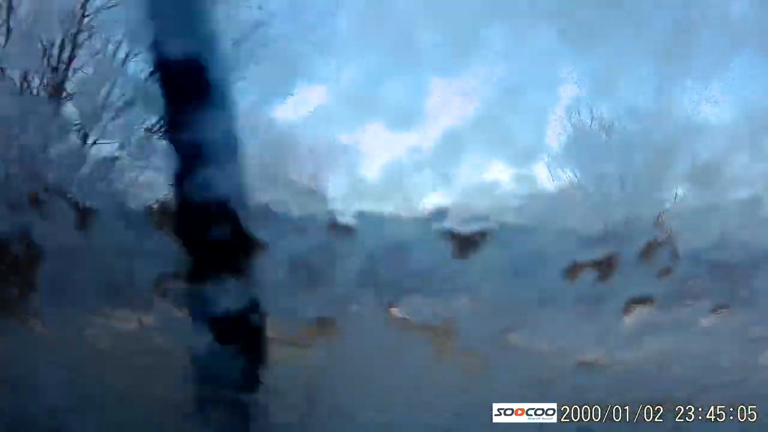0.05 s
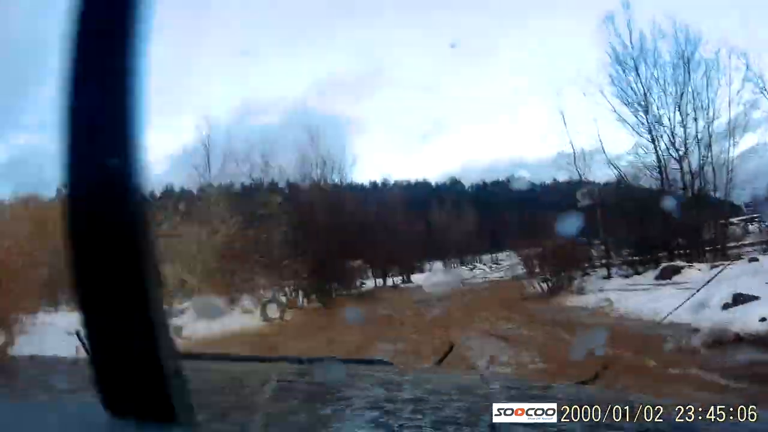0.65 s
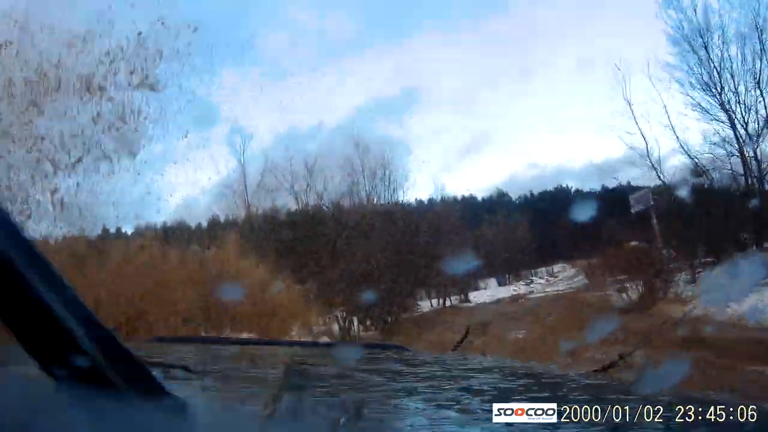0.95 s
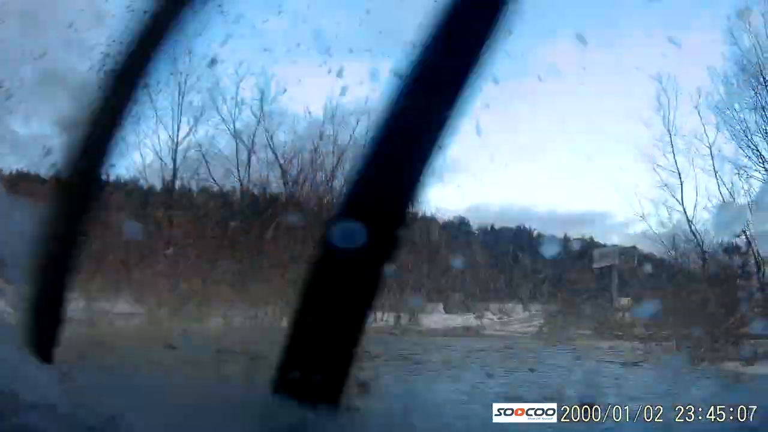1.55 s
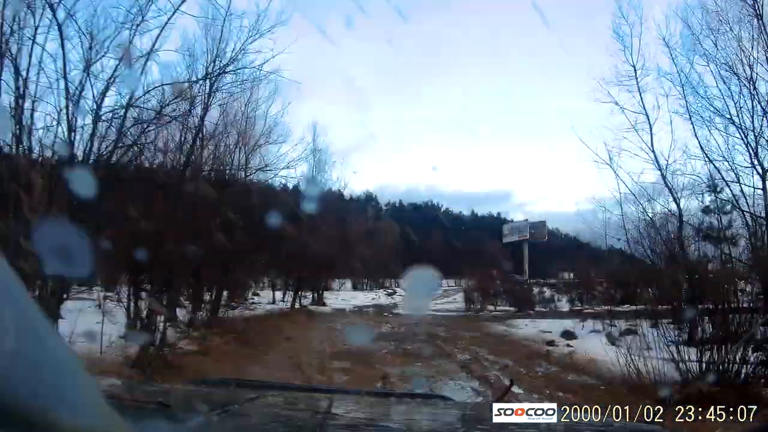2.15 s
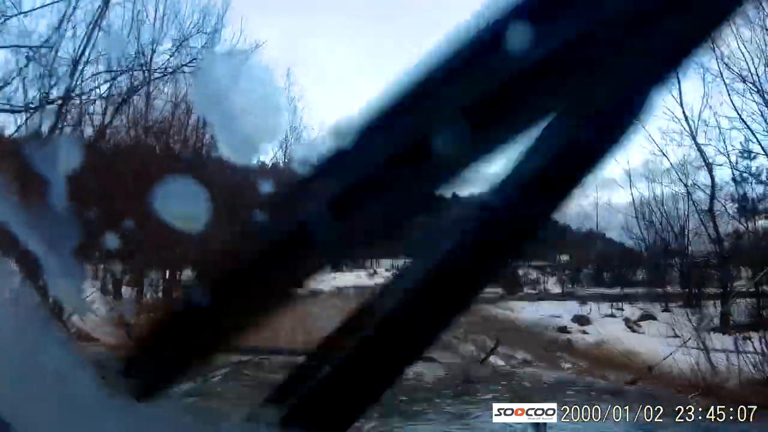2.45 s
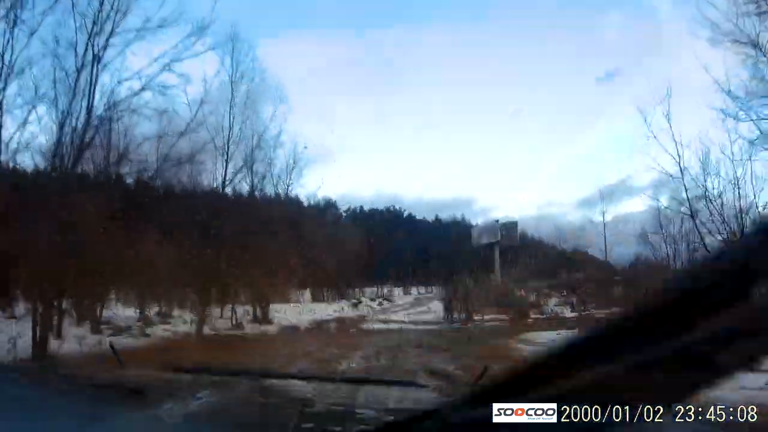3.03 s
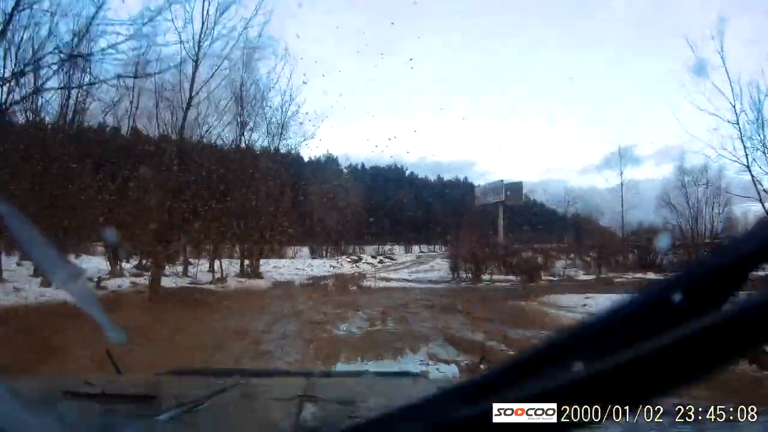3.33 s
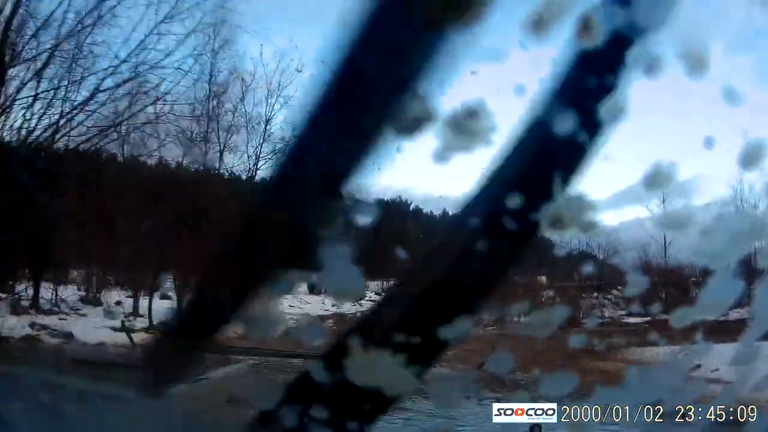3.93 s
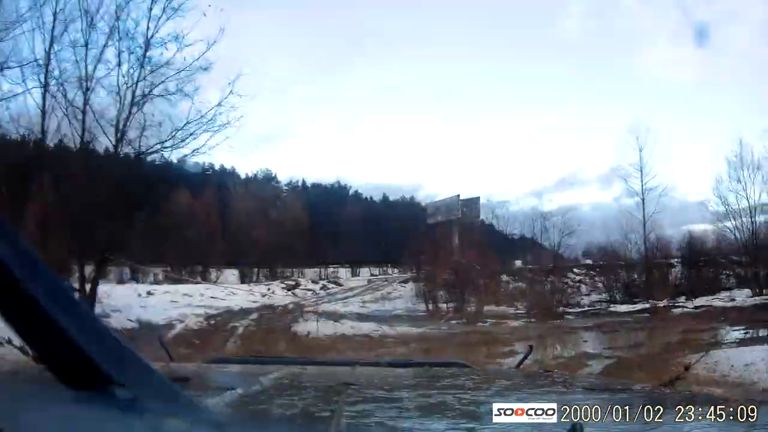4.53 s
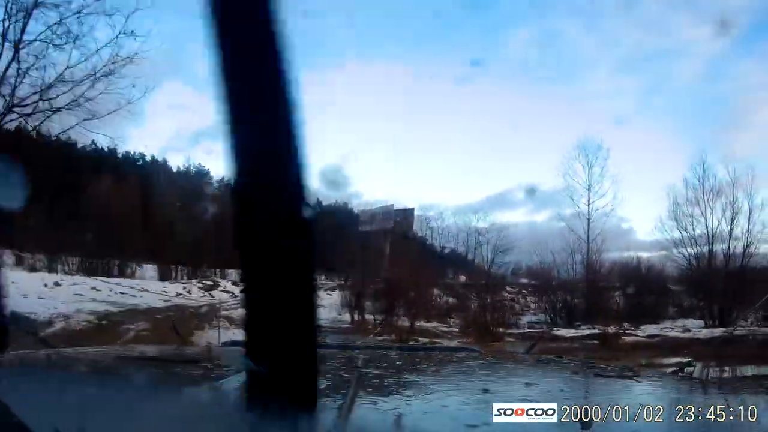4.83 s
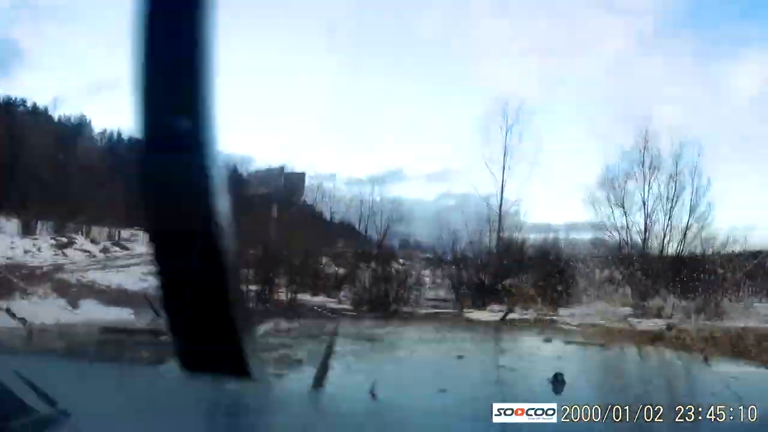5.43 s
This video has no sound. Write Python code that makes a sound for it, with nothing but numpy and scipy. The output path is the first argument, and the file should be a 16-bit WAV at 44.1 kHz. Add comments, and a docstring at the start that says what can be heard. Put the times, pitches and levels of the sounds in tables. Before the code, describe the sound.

An off-road vehicle pushes through deep puddles, heard from the cabin. Dull, gurgling water pounds the body, with dry panel clacks, hissing spray and fat drops tapping the windscreen over the engine's hum. After a short lull of drips, the body heaves on ruts and the water returns. Finally the engine rises in pitch and another heavy splash hits, slightly distorting the small microphone near the glass.

```python
"""Inside an off-road vehicle driven hard through deep, slushy puddles, heard at the windscreen.
Over the engine's drone, thrown water drums on the floor, sets panels booming and sprays the glass,
while loose parts knock and tick. After two seconds the wash eases, leaving drops and small plinks.
Near three seconds the body heaves on the ruts and the water surges again. At the end the engine
revs up into one more heavy splash. The biggest peaks overload the small microphone."""
import sys
import numpy as np
from scipy import signal
from scipy.fft import rfft, irfft, next_fast_len
from scipy.io import wavfile
from scipy.ndimage import uniform_filter1d

SR = 44100
rng = np.random.default_rng(int(sys.argv[2]) if len(sys.argv) > 2 else 0)


def inscribe(sig):
    """Save sig as 16-bit PCM at rate SR to the path in sys.argv[1].

    A 1-D sig is mono; a 2-D sig holds one channel per row.
    Samples are clipped to [-1, 1] before scaling.
    """
    pcm = np.round(np.clip(np.atleast_2d(sig).T, -1, 1) * 32767)
    wavfile.write(sys.argv[1], SR, pcm.astype(np.int16))


N = 250267
TIME = np.arange(N) / SR
PLINK_HZ = 1842

# Water thrown at the body by the wheels. Each row: time in seconds, relative level in dB.
WHEEL_WASH = [(0.0, -25), (0.03, -21.5), (0.25, -28.5), (0.33, -22), (0.5, -22), (0.6, -18), (0.63, -19),
              (0.77, -18), (0.84, -10.5), (0.88, -18), (0.92, -13.5), (1.04, -16), (1.11, -24), (1.13, -13),
              (1.17, -26.5), (1.22, -30), (1.39, -17), (1.44, -22.5), (1.75, -17.5), (1.85, -34),
              (1.99, -24.5), (2.97, -23), (3.0, -15), (3.03, -27.5), (3.33, -24.5), (3.38, -16),
              (3.44, -26), (3.49, -20), (3.62, -15), (3.69, -29.5), (3.76, -20), (4.34, -24), (4.37, -23.5),
              (4.44, -25.5), (4.48, -19), (4.53, -23.5), (5.16, -26), (5.26, -19), (5.35, -22), (5.46, -11),
              (5.5, -25.5), (5.62, -10.5), (5.67, -19.5)]
# Fine spray on the glass. Each row: time in seconds, level in dB.
SPRAY_LEVEL = [(0, -41.5), (.2, -48.5), (.53, -43), (.62, -40.5), (.7, -44.5), (.82, -37), (.88, -47),
               (.96, -37.5), (1.08, -58), (1.2, -54.5), (1.3, -45.5), (1.72, -37), (1.82, -51.5),
               (2.1, -47), (3.28, -49.5), (3.4, -42.5), (3.57, -46.5), (4.1, -42.5), (4.88, -45),
               (5.17, -51), (5.33, -40.5), (5.44, -32.5), (5.53, -40.5), (5.6, -36.5), (5.67, -36)]


def from_db(db):
    """Decibels to gain."""
    return 10 ** (np.asarray(db) / 20)


def rms_one(x):
    """Scale to unit rms."""
    return x / np.sqrt(np.mean(x ** 2) + 1e-20)


def curve(rows):
    """Join points of time and value into a value for every sample."""
    return np.interp(TIME, *np.transpose(rows))


def drift(rate):
    """Smooth random motion of rms 1 that changes about rate times a second."""
    hz = np.fft.rfftfreq(N, 1 / SR)
    return rms_one(irfft(rfft(rng.standard_normal(N)) / (1 + (hz / rate) ** 4), N))


def wavering(hz, waver, rate):
    """Phase of an oscillation whose pitch wanders."""
    return 2 * np.pi * np.cumsum(hz * (1 + waver * drift(rate))) / SR


def coloured(x, spectrum):
    """Shape a steady texture with an EQ curve, silent above its last point; rms 1."""
    size = next_fast_len(N)
    hz, db = np.transpose(spectrum)
    bins = np.fft.rfftfreq(size, 1 / SR)
    gain = from_db(np.interp(np.log(np.maximum(bins, 1)), np.log(hz), db)) * (bins < hz[-1])
    return rms_one(irfft(rfft(x, size) * gain, size)[:N])


def resonate(x, hz, width_hz):
    """One resonance with unity gain at its peak."""
    r = np.exp(-np.pi * width_hz / SR)
    poles = [1, -2 * r * np.cos(2 * np.pi * hz / SR), r * r]
    return signal.lfilter(np.array([1, 0, -1]) * (1 - r * r) / 2, poles, x + 1e-18)


def grains(per_s, spread_db):
    """Random tiny impacts of uneven size and either sign."""
    sizes = from_db(spread_db * np.minimum(rng.exponential(1, N), 4))
    return (rng.random(N) < per_s / SR) * sizes * rng.choice([-1, 1], N)


def contact(t, scatter_db, t60):
    """A sharp touch with a dying tail of chatter and near reflections."""
    return (t == 0) + from_db(scatter_db - 60 * t / t60) * rng.standard_normal(len(t))


def add(out, s, sound, peak_db):
    """Mix in a one-shot at s seconds with the given peak."""
    i = int(np.clip(s * SR, 0, N - 1))
    out[i:i + len(sound)] += (from_db(peak_db) * sound / np.abs(sound).max())[:N - i]


def strike(events, modes, mode_spread_db, scatter_db, scatter_t60, crack_db, crack_t60=0.0033):
    """Each blow cracks briefly and rings the modes in a balance of its own."""
    out, t = np.zeros(N), np.arange(SR // 10) / SR
    hz, db, t60 = np.transpose(modes)[:, :, None]
    for s, peak_db in events:
        mode_db = db + mode_spread_db * rng.standard_normal(hz.shape)
        rings = from_db(mode_db - 60 * t / t60) * np.sin(2 * np.pi * hz * t)
        crack = from_db(crack_db - 60 * t / crack_t60) * rng.standard_normal(len(t))
        tail = signal.fftconvolve(rings.sum(0), contact(t, scatter_db, scatter_t60))[:len(t)]
        add(out, s, crack + tail, peak_db)
    return out


def ringing(rows, width_share):
    """Water excites a resonance for a moment: one swell of pitched noise a row."""
    out, t = np.zeros(N), np.arange(-SR // 3, SR // 3) / SR
    edge = 1 + width_share / 2
    for s, length, hz, db in rows:
        band = signal.butter(3, [hz / edge, hz * edge], "band", fs=SR, output="sos")
        swell = np.exp(-(2 * t / length) ** 2)
        tone = swell * signal.sosfilt(band, rng.standard_normal(len(t)))
        tone *= np.linalg.norm(swell) / np.linalg.norm(tone)   # rms 1 at the top of the swell
        out += from_db(db) * np.interp(TIME, s + t, tone, left=0, right=0)
    return out


def engine(rough=0.3, hum_rough=0.04):
    """The firing tone hums smoothly in the cabin under rougher overtones and half orders."""
    # Engine speed. Each row: time in seconds, firing rate in Hz.
    firing_rate = [(0, 142.7), (.2, 140.1), (.5, 145.2), (1.2, 140), (1.6, 144.4), (1.95, 142.3),
                   (2.4, 146.7), (2.85, 149.1), (3.45, 154), (4.75, 153), (5.2, 166.7), (5.67, 165.4)]
    # Fader for the firing tone. Each row: time in seconds, level in dB.
    hum_level = [(0, -23.5), (.25, -35.5), (.5, -27.5), (1.4, -41), (1.62, -22), (1.9, -26), (2.2, -29.5),
                 (2.5, -24.5), (2.85, -25.5), (3.15, -45.5)]
    # Fader for all the overtones. Each row: time in seconds, gain in dB.
    overtone_level = [(0, -39), (.35, -28.5), (1.2, -48), (2.6, -31), (3.3, -47), (4.1, -33.5),
                      (5.1, -31.5), (5.67, -27)]
    # The overtones. Each row: multiple of the firing rate, relative level in dB.
    orders = [(1.5, -14), (2, 2.5), (2.5, -7.5), (3, -11.5), (3.5, -14.5)]
    phase = wavering(curve(firing_rate), waver=0.0044, rate=13.8)
    overtones = np.zeros(N)
    for multiple, db in orders:
        partial = np.sin(multiple * phase + rng.uniform(0, 2 * np.pi))
        overtones += from_db(db) * partial * (1 + rough * drift(2.8))
    hum = np.sin(phase) * (1 + hum_rough * drift(7.2))
    return from_db(curve(overtone_level)) * overtones + from_db(curve(hum_level)) * hum


def body_rumble(gain_db=6, steady_s=0.1, shudder_hz=48):
    """The sprung body heaves on the ruts and shudders at its own pitch at each hole."""
    # The ride over the ruts. Each row: time in seconds, relative level in dB.
    ruts = [(0.0, -33), (0.71, -27), (0.85, -28.5), (1.55, -25), (2.62, -31.5), (2.94, -17), (3.33, -22.5),
            (3.81, -23), (5.23, -27.5), (5.56, -22.5), (5.67, -20.5)]
    # The body's deep rumble. Each row: frequency in Hz, EQ gain in dB.
    rumble_eq = [(5, -2.5), (14, 11.5), (24, 12.5), (36, 0), (49, 4.5), (65, 4), (90, -19.5), (160, -9)]
    # Wheels drop into holes. Each row: centre in seconds, length in seconds, level in dB.
    holes = [(.33, 0.086, -12), (1.68, 0.19, -13.5), (2.09, 0.055, -18), (2.87, 0.035, -18.5),
             (2.97, 0.2, -14.5), (3.43, 0.044, -9.5), (3.83, 0.052, -12.5), (4.35, 0.076, -18),
             (5.64, 0.06, -6)]
    shake = coloured(rng.standard_normal(N), rumble_eq)
    shake /= np.sqrt(uniform_filter1d(shake ** 2, int(steady_s * SR)) + 1e-3)   # even out the level
    jolts = sum(from_db(db) * np.exp(-(2 * (TIME - s) / length) ** 2) for s, length, db in holes)
    shudder = np.sqrt(2) * np.sin(wavering(shudder_hz, waver=0.1307, rate=18.44))
    return from_db(curve(ruts) + gain_db) * shake + jolts * shudder


def rattle(per_s=55, loose_above_db=-18, offset_db=-5):
    """Times and strengths of light random blows, only while the water shakes the body hard."""
    wash_db = curve(WHEEL_WASH)
    chances = rng.integers(0, N, int(per_s * N / SR))
    return [(TIME[i], wash_db[i] + offset_db) for i in chances if wash_db[i] > loose_above_db]


def panel_knocks(gain_db=3, clack_hz=1300, clack_s=0.0016, ring_db=-8, rebound_s=0.023, rebound_db=-15):
    """A loose panel hits its frame with a dry clack and a faint ring; each listed hit rebounds once."""
    # The panel's listed hits, some of them quick second hits just after the one before. Each row: start in
    # seconds, relative peak in dB.
    hits = [(0.0616, -12.5), (0.083, -19), (0.5852, -19.5), (0.597, -16.5), (0.6536, -15), (0.7214, -6),
            (0.793, -16), (0.824, -22), (0.8657, -22), (0.94, -22), (0.9757, -30), (0.994, -25.5),
            (1.274, -15.5), (1.4705, -4.5), (1.5483, -8), (1.683, -12), (2.7091, -7.5), (2.846, -22.5),
            (2.9148, -11), (2.9434, -11.5), (3.0869, -7), (3.3041, -25), (3.3508, -22.5), (3.5984, -15.5),
            (3.6675, -21), (3.6872, -21), (3.7325, -14.5), (3.7503, -19.5), (5.2402, -16), (5.3104, -9.5),
            (5.4099, -39), (5.424, -11.5), (5.4438, -13), (5.4898, -15.5), (5.516, -19.5), (5.5644, -14),
            (5.5895, -20.5), (5.6481, -26)]
    # The panel's modes. Each row: pitch in Hz, relative level in dB, seconds to fall by 60 dB.
    panel_modes = [(973, 6, 0.061), (1098, 2, 0.1), (1454, 2.5, 0.08), (1833, 12, 0.021), (2724, 7, 0.0097)]
    blows = hits + rattle()
    blows += [(s + rebound_s * rng.uniform(.85, 1.15), db + rebound_db) for s, db in hits]
    clacks, t = np.zeros(N), np.arange(SR // 100) / SR
    for s, peak_db in blows:
        hz = clack_hz * (1 + 0.078 * rng.standard_normal())
        attack = 1 - np.exp(-t * from_db(peak_db) / 0.00012)   # light blows start more bluntly
        add(clacks, s, attack * np.exp(-(t / clack_s) ** 2) * np.sin(2 * np.pi * hz * t), peak_db)
    ring = strike(blows, panel_modes, mode_spread_db=2.0, scatter_db=-15, scatter_t60=0.026, crack_db=-18)
    soften = signal.butter(2, 4500, fs=SR, output="sos")
    return from_db(gain_db) * signal.sosfilt(soften, clacks + from_db(ring_db) * ring)


def ticks(gain_db=1, snap_hz=(3500, 7700), body_db=-5):
    """Small hard parts touch: a bright snap of a few milliseconds with some body below it."""
    # Loose parts making contact. Each row: start in seconds, relative peak in dB.
    touches = [(0.6545, -22), (0.958, -22), (0.992, -28), (1.5159, -18), (1.547, -16), (1.5643, -15.5),
               (1.5832, -20), (1.7123, -6.5), (2.877, -22), (2.982, -11), (3.95, -27), (4.1193, -11),
               (4.237, -20.5), (4.658, -25.5), (5.436, -13), (5.5794, -14.5), (5.594, -16), (5.665, -22)]
    out, t = np.zeros(N), np.arange(SR // 20) / SR
    bright = signal.butter(7, snap_hz, "band", fs=SR, output="sos")
    for s, peak_db in touches:
        touch = contact(t, scatter_db=-7.0, t60=0.0052)
        snap = signal.sosfilt(bright, touch)
        body = from_db(body_db) * resonate(touch, PLINK_HZ, width_hz=870)
        add(out, s, snap + body, peak_db + gain_db)
    return out


def plink(pitch_spread=0.027, attack_s=0.00031, t60=0.014):
    """One small drip: a round, nearly pure ping, each at a slightly different pitch."""
    t = np.arange(SR // 20) / SR
    hz = PLINK_HZ * (1 + pitch_spread * rng.standard_normal())
    return (1 - np.exp(-t / attack_s)) * from_db(-60 * t / t60) * np.sin(2 * np.pi * hz * t)


def drips():
    """The clearest drips plink one by one."""
    # Small drips landing. Each row: start in seconds, peak in dB.
    landings = [(2.237, -32), (2.365, -30), (2.58, -30), (3.5316, -29.5), (4.2371, -24.5), (4.3931, -34),
                (4.6584, -25.5)]
    out = np.zeros(N)
    for s, peak_db in landings:
        add(out, s, plink(), peak_db)
    return out


def glass_taps(events, hollow_hz=2900, top_hz=6300, edge_db=-24):
    """Drops tap the glass: a round body, a bright tick, a scoop between them and a faint treble edge."""
    # The windscreen's modes. Each row: pitch in Hz, relative level in dB, seconds to fall by 60 dB.
    glass_modes = [(1473, -4.5, 0.023), (1830, 14.5, 0.003), (3670, 4.5, 0.0038), (4206, 6.5, 0.0039),
                   (5040, -3.5, 0.0033), (5800, -9, 0.012)]
    taps = strike(events, glass_modes, mode_spread_db=7.0, scatter_db=-21, scatter_t60=0.027, crack_db=13)
    scooped = taps - resonate(taps, hollow_hz, hollow_hz / 2)
    rounded = signal.sosfilt(signal.butter(8, top_hz, fs=SR, output="sos"), scooped)
    return rounded + from_db(edge_db) * scooped


def patter(per_s=22, ping_db=-35, tap_db=-24, spread_db=5, follow=0.8):
    """Small drops fall at random, harder in thick spray, each with its own mix of plink and tap."""
    spray_db = curve(SPRAY_LEVEL)
    force_db = follow * (spray_db - spray_db.mean())
    pings, taps = np.zeros(N), []
    for when, ping_size, tap_size in rng.random((int(per_s * N / SR), 3)):
        i = int(when * N)
        taps.append((TIME[i], force_db[i] + tap_db + spread_db * (2 * tap_size - 1)))
        add(pings, TIME[i], plink(), force_db[i] + ping_db + spread_db * (2 * ping_size - 1))
    return pings + glass_taps(taps)


def spray(flicker_db=1.0):
    """Countless fine droplets merge into a hiss on the glass."""
    # The spray's hiss. Each row: frequency in Hz, EQ gain in dB.
    spray_eq = [(1300, 8), (1800, 11), (2500, -3.5), (3200, -3.5), (4300, 2.5), (5400, -6), (6700, -6.5),
                (9000, -13.5), (11300, -10), (13000, -26), (14500, -14.5), (16000, -35)]
    hiss = coloured(grains(12000, spread_db=2.0), spray_eq)
    return hiss * from_db(curve(SPRAY_LEVEL) + flicker_db * drift(42))


def squirt():
    """A thin jet of water hisses on the glass in a narrow, high band."""
    # The jet. Each row: centre in seconds, length in seconds, pitch in Hz, level in dB.
    jets = [(4.755, 0.053, 4680, -42)]
    return ringing(jets, width_share=0.083)


def slaps(gain_db=2, attack_s=0.00052, drain_t60=0.097):
    """A gout of water hits the windscreen at once, bursts into drops and drains away."""
    # Gouts of water. Each row: start in seconds, hold in seconds, relative level in dB.
    gouts = [(0.585, 0.0098, -35.5), (0.596, 0.0082, -40), (0.653, 0.014, -37), (1.272, 0.022, -39.5),
             (1.372, 0.018, -40), (2.869, 0.0038, -37), (3.521, 0.017, -42), (3.56, 0.048, -45.5),
             (3.698, 0.047, -40), (4.488, 0.0055, -37.5), (4.85, 0.035, -45), (5.45, 0.01, -25.5),
             (5.604, 0.028, -33)]
    # The bright splatter. Each row: frequency in Hz, EQ gain in dB.
    splatter_eq = [(600, 6), (1400, 11), (2700, 3), (4300, 12.5), (5400, 4.5), (6700, 6.5), (9000, -3.5),
                   (11300, -2), (13000, -16), (14700, -9), (16000, -26)]
    flow = np.zeros(N)
    for s, hold, db in gouts:
        attack = np.clip((TIME - s) / attack_s, 0, 1)
        drain_db = 60 * np.clip((TIME - s - hold) / drain_t60, 0, 3)
        flow += attack * from_db(db - drain_db)
    return from_db(gain_db) * flow * coloured(grains(3000, spread_db=3.5), splatter_eq)


def flutter(x, delay_s=0.0017, feedback=0.5):
    """Sound bounces between windscreen and dashboard and takes on a thin ring."""
    echo_loop = np.r_[1, np.zeros(int(delay_s * SR)), -feedback]
    return signal.lfilter([np.sqrt(1 - feedback ** 2)], echo_loop, x + 1e-18)


def fat_drops(gain_db=2.5):
    """Single fat drops land on the windscreen and ring the glass."""
    # The drops landing. Each row: start in seconds, relative peak in dB.
    landings = [(0.0296, -9.5), (0.3795, -17), (0.6528, -2), (1.138, -29), (1.3285, -18), (1.9725, -19.5),
                (2.092, -22), (2.2805, -18.5), (2.3396, -24), (2.4635, -19), (2.6353, -9.5), (2.663, -18.5),
                (2.912, -10.5), (3.3312, -20.5), (3.3507, -22), (3.403, -15.5), (3.433, -13), (3.664, -28),
                (3.747, -8), (3.7743, -18), (3.8806, -19), (3.901, -28), (3.9953, -11.5), (4.0109, -12),
                (4.0716, -19), (4.083, -13), (4.182, -8), (4.2159, -27), (4.5397, -16), (4.5797, -16.5),
                (4.7466, -13.5), (4.8147, -12), (5.182, -22), (5.2263, -15.5), (5.3105, -2.5),
                (5.428, -7.5)]
    return from_db(gain_db) * glass_taps(landings)


def panel_booms():
    """Heavy sheets of water set a body panel booming."""
    # The booms. Each row: centre in seconds, length in seconds, pitch in Hz, level in dB.
    booms = [(.595, 0.026, 643, -13), (.825, 0.03, 718, -10.5), (.84, 0.062, 205, -17.5),
             (.848, 0.016, 407, -10.5), (.955, 0.072, 290, -12.5), (.965, 0.072, 378, -15.5),
             (1.0, 0.335, 105.4, -15), (1.04, 0.032, 624, -14), (1.348, 0.021, 596, -14.5),
             (1.685, 0.055, 294, -17), (1.74, 0.12, 125, -12.5), (1.75, 0.05, 238, -12),
             (3.6, 0.21, 184.6, -20), (3.8, 0.056, 206, -23.5), (4.37, 0.034, 650, -20.5),
             (4.484, 0.11, 87, -22.5), (5.45, 0.065, 200, -11.5), (5.458, 0.024, 476, -11),
             (5.65, 0.082, 118.2, -11), (5.63, 0.11, 195.5, -14.5)]
    return ringing(booms, width_share=0.3)


def water_drumming(gain_db=0.5, gurgle_db=3.0, gurgle_hz=29.0):
    """Lumps of water drum on the steel, their weight shifting from panel to panel along the body."""
    # The dull drumming of the panels. Each row: frequency in Hz, EQ gain in dB.
    drum_eq = [(45, -21), (85, 3), (140, -3), (220, -0.5), (320, 1.5), (400, -0.5), (540, -2), (670, 0),
               (770, -8.5), (900, -20.5), (1100, -24), (1800, -46), (2500, -20)]
    gurgle = np.zeros(N)
    for hz in np.geomspace(90, 1500, 12):
        band = signal.butter(2, [hz / 1.14, hz * 1.14], "band", fs=SR, output="sos")
        lumps = signal.sosfilt(band, grains(2500, spread_db=4.0) + 1e-18)
        gurgle += lumps * from_db(gurgle_db * drift(gurgle_hz))
    return coloured(gurgle, drum_eq) * from_db(curve(WHEEL_WASH) + gain_db)


def scene():
    """The mono mix of vehicle and water, as heard at the windscreen."""
    vehicle = engine() + body_rumble() + panel_knocks() + ticks()
    wash = water_drumming() + spray() + panel_booms()
    splatter = flutter(slaps() + squirt()) + fat_drops() + drips() + patter()
    return (vehicle + wash + splatter)[None]


def record(dry, ceiling=0.67, cutoff_hz=15900):
    """The microphone flattens the biggest peaks; the highest treble is cut."""
    squashed = dry / (1 + (dry / ceiling) ** 10) ** (1 / 10)
    return signal.sosfilt(signal.ellip(10, .2, 80, cutoff_hz, fs=SR, output="sos"), squashed)


dry = scene()
out = record(dry)
inscribe(out)
```